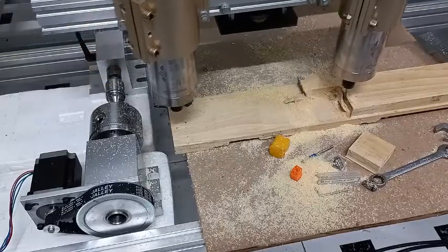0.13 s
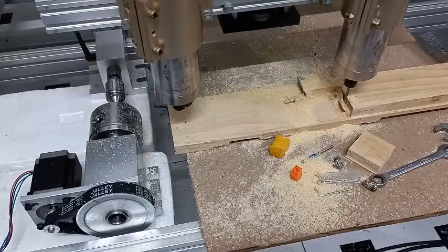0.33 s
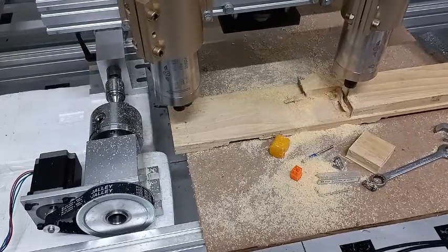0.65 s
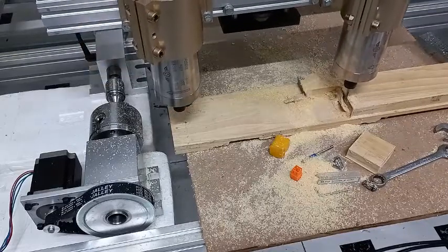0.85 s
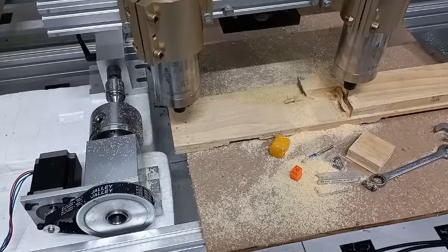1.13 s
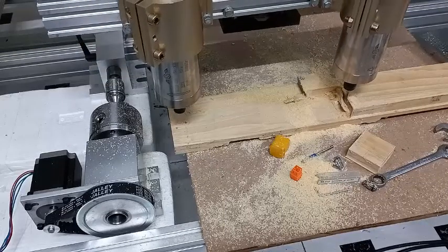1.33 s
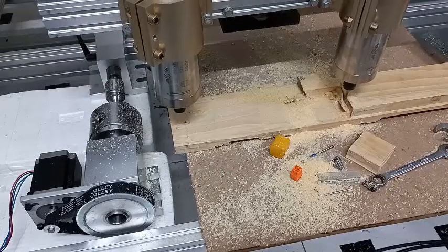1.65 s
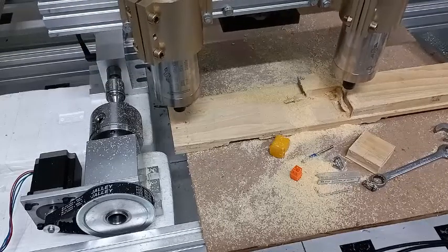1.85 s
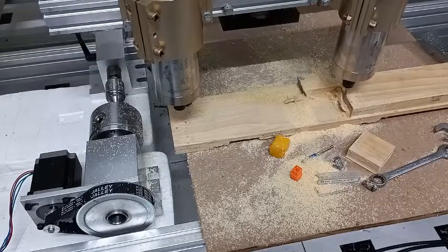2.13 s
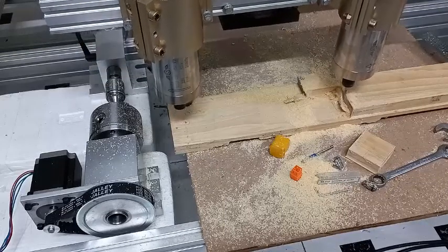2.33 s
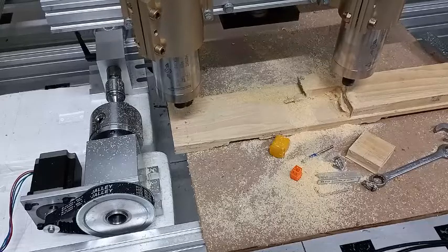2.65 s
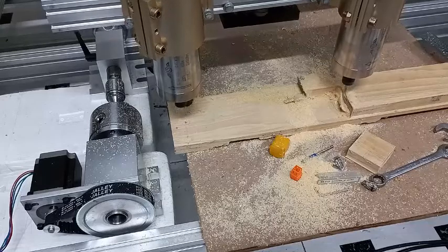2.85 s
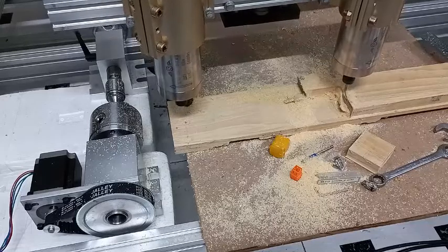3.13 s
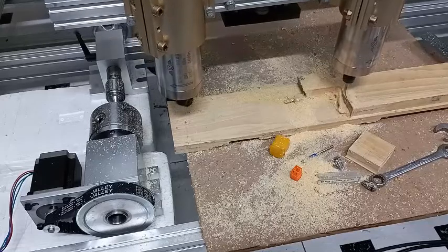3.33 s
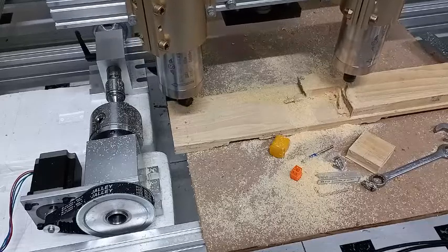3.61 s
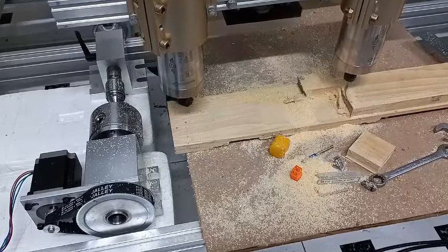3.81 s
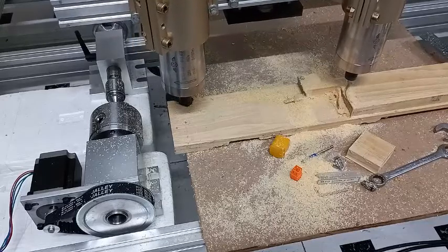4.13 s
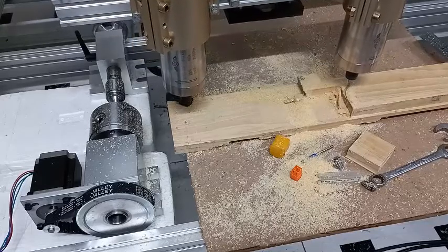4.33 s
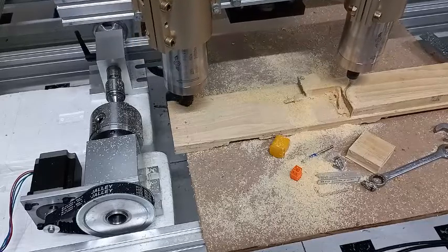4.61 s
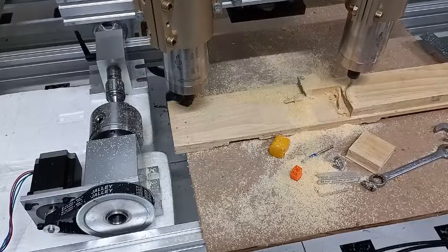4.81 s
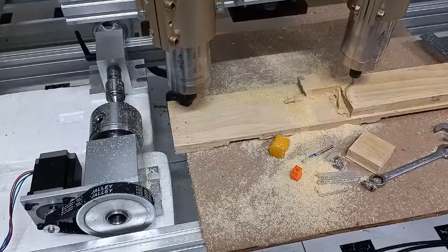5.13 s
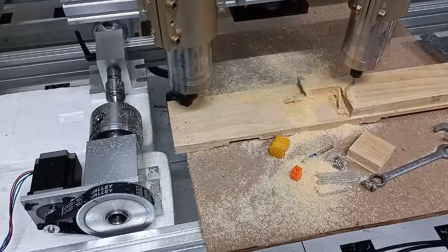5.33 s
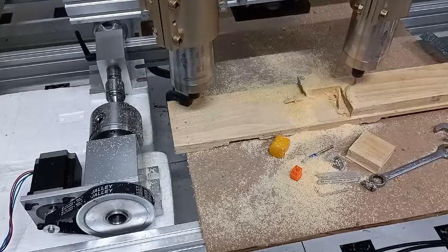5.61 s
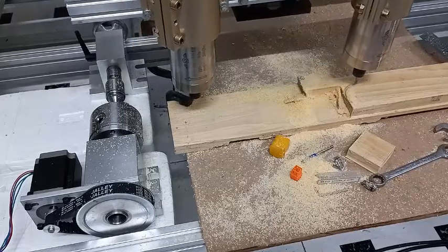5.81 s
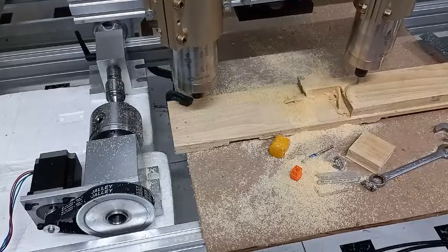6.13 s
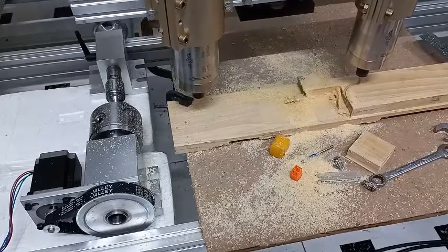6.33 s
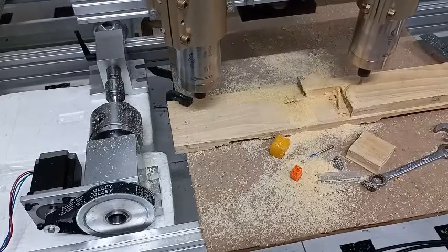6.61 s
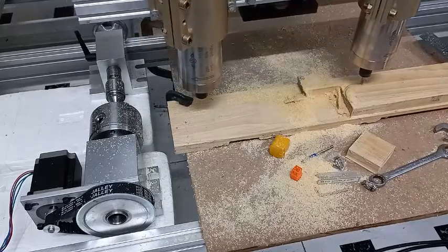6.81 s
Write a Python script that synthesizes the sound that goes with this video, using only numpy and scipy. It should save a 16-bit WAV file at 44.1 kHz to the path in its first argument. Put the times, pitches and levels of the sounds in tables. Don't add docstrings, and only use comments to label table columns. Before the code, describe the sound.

Two router spindles whine steadily; one bites a board with tearing, buzzing noise, squeals briefly, then locks into a shrill continuous scream.

```python
import sys
import numpy as np
from scipy import signal
from scipy.fft import rfft, irfft
from scipy.io import wavfile
from scipy.ndimage import uniform_filter1d, map_coordinates

SR = 44100
rng = np.random.default_rng(int(sys.argv[2]) if len(sys.argv) > 2 else 0)


def gain_from_decibels(decibels):
    exponent = np.asarray(decibels, float) / 20
    return 10 ** exponent


def store_wav(level_fs):
    pcm = np.round(np.clip(np.atleast_2d(level_fs), -1, 1) * 32767)
    wavfile.write(sys.argv[1], SR, pcm.T.astype(np.int16))


N = 306936
TIME = np.arange(N) / SR
TOUCH_S, LOCK_S, SETTLE_S = 1.1, 3.47, 4.55


def unit(x):
    return x / np.sqrt(np.mean(x ** 2) + 1e-20)


def along(points, hz):
    f, v = np.transpose(points)
    return np.interp(np.log(hz + 1), np.log(f + 1), v)


def curves(rows):
    s, *cols = np.transpose(rows)
    return [np.interp(TIME, s, c) for c in cols]


def wobble(rate):
    knots = rng.standard_normal(int(N * rate / SR) + 4)
    return map_coordinates(knots, [TIME * rate], order=1)


def after(s, rise=0.046):
    return np.clip((TIME - s) / rise + .5, 0, 1)


def swells(rows):
    return sum(gain_from_decibels(db) * np.exp(-((TIME - s) / half) ** 2) for s, db, half in rows) + 1e-9


def turns(hz):
    return 2 * np.pi * np.cumsum(hz + 0 * TIME) / SR


def tone(phase, db, pan_db, lead):
    left = gain_from_decibels(db + pan_db / 2) * np.sin(phase + lead / 2)
    right = gain_from_decibels(db - pan_db / 2) * np.sin(phase - lead / 2)
    return np.sqrt(2) * np.array([left, right])


# (frequency [Hz], likeness [0-1])
PORT_LIKENESS = [(40, .4), (90, .5), (160, .95), (300, .92), (600, .7), (950, .4), (1300, .28), (5000, .08)]


def rush(spectrum, patchy_db):
    left_lag_s = .00013
    hz, _, z = signal.stft(rng.standard_normal((2, N)), SR, nperseg=1024)
    field = uniform_filter1d(rng.standard_normal(z.shape[1:]), size=8, axis=0)
    field = uniform_filter1d(field, size=6, axis=1)
    gain = gain_from_decibels(patchy_db * unit(field) + along(spectrum, hz)[:, None])
    turn = np.arccos(np.clip(along(PORT_LIKENESS, hz), -1, 1))[:, None] / 2
    mid, side = z * gain * [np.cos(turn), np.sin(turn)]
    late = np.exp(-2j * np.pi * hz * left_lag_s)[:, None]
    ports = np.array([(mid + side) * late, mid - side])
    return unit(signal.istft(ports, nperseg=1024)[1][:, :N])


# (time [s], level [dB])
CUT_DEPTH = [(1.04, -52), (1.12, -24), (1.5, -14), (1.95, -3.5), (2.3, -5.5), (2.95, -3.5), (3.3, -1.5),
             (3.45, -3.5), (3.58, -7.5), (4.3, -9.5), (6.96, -10.5)]


def effort(idle_db, deep_db, grows, locked_db):
    cut_db = deep_db + grows * curves(CUT_DEPTH)[0] + locked_db * after(LOCK_S, rise=0.16)
    return np.hypot(gain_from_decibels(idle_db), after(TOUCH_S) * gain_from_decibels(cut_db))


def burst(shaft, depth):
    return unit(1 + depth * np.cos(shaft))


# (time [s], lag [half turns])
SLIP = [(0, -1.9), (1.29, .5), (2.17, 1.5), (3.08, 2.5), (3.43, 3.5), (3.97, 4.5), (6.63, 9.5),
        (6.96, 10.1)]


def cutting_shaft(idle):
    return idle - np.pi * curves(SLIP)[0]


def dying(db, hold_s, db_per_s):
    return gain_from_decibels(db - db_per_s * np.maximum(TIME - hold_s, 0))


# (frequency [Hz], density [dB per Hz])
BRAKE_LOW = [(120, -16), (250, -3.5), (400, 3.5), (700, 7), (1000, -5), (1400, -31)]
BRAKE_HIGH = [(700, -31), (1100, 6), (1600, 0.5), (2200, -5.5), (3200, -12), (5000, -21)]


def brake():
    out = dying(-42, hold_s=0.26, db_per_s=62) * rush(BRAKE_LOW, patchy_db=2.5)
    return out + dying(-51.5, hold_s=0.19, db_per_s=120) * rush(BRAKE_HIGH, patchy_db=1.5)


# (start [s], end [s], start pitch [Hz],
# end pitch [Hz], level [dB])
GLIDES = [(0.0, 0.22, 1250, 700, -50), (0.105, 0.195, 880, 710, -43), (0.24, 0.35, 1080, 740, -53),
          (0.0, 0.08, 760, 640, -48), (0.19, 0.25, 690, 590, -46), (1.75, 2.15, 1262, 1256, -54),
          (1.75, 2.15, 1643, 1637, -52), (3.6, 4.9, 300, 140, -68), (4.85, 5.04, 138, 132, -58),
          (4.85, 5.04, 518, 514, -60), (6.66, 6.86, 138, 132, -58), (6.66, 6.86, 518, 514, -58)]


def feed_motors():
    out = 0
    for start, end, from_hz, to_hz, db in GLIDES:
        u = np.clip((TIME - start) / (end - start), 0, 1)
        swell = np.sqrt(np.abs(np.sin(np.pi * u)))
        lead = .2
        if from_hz > 1000:
            lead = 3 if start < 1 else -1.4
        hz = from_hz * (to_hz / from_hz) ** u * (1 + 0.005 * wobble(40))
        out += swell * tone(turns(hz), db + 2.5 * wobble(35), 0, lead)
    return out


# (time [s], level [dB], left-right [dB])
HUM = [(.4, -43.5, 6), (.56, -47.5, 0.5), (1.07, -38, 0), (1.4, -39.5, -1.5), (2.05, -33.5, -1),
       (2.6, -40.5, -6.5), (3.25, -33, 1), (3.43, -34, 2), (3.58, -43.5, -7.5), (4.25, -47.5, -14.5),
       (4.9, -39, -0.5), (5.5, -37, 1), (6.4, -34.5, 3.5), (6.96, -35, 0.5)]


def unbalance_hum(shaft):
    db, pan_db = curves(HUM)
    lead = np.interp(TIME, (4.2, 4.8), (-.55, .05))
    return tone(shaft, db + 1.38 * wobble(25), pan_db, lead)


def second_order(shaft, idle):
    free_db = -49 - 3 * after(2.1, rise=0.25) + wobble(25)
    strain = gain_from_decibels(-41.5 + 0.5 * curves(CUT_DEPTH)[0]) + swells([(1.92, -39.5, 0.15), (2.48, -46, 0.15)])
    cut_db = 20 * np.log10(strain) + 1.5 * wobble(25)
    free = tone(2 * idle, free_db, -1.6, -0.3)
    return free + after(TOUCH_S) * tone(2 * shaft, cut_db, 0.64, -0.27)


# (frequency [Hz], level [dB])
INVERTER = [(4243, -69), (4300, -74.5), (4360, -75), (5092, -68.5), (5855, -73), (6236, -66.5), (6618, -63),
            (6999, -69.5), (7381, -61.5), (7764, -109), (8146, -67), (8527, -86.5), (8964, -121),
            (9346, -83), (9788, -83), (10111, -93)]
MOTOR_LINES = [(200, -72), (266, -68.5), (577, -64), (1049, -67), (1144.5, -73)]


def drive_whine():
    out = 0
    for hz, db in INVERTER + MOTOR_LINES:
        high = hz > 2000
        phase = turns(hz + 1.61 * wobble(8))
        out += tone(phase, db + 0.5 + 3.7 * wobble(7), 3 * wobble(0.94) * high, 5.2 * wobble(0.31) * high)
    return out


def fans():
    fan_hz = 5328
    beat_hz = np.interp(TIME, (.25, .55), (16, 7)) + (1.5 + 7 * after(TOUCH_S)) * wobble(6)
    db = np.interp(TIME, (0, 2.0, 2.6), (-61, -59.5, -67)) + 3 * after(TOUCH_S) * wobble(18)
    return tone(turns(fan_hz), db, 5, .6) + tone(turns(fan_hz + beat_hz), db - 2.5, 5, .6)


# (frequency [Hz], density [dB per Hz])
RUMBLE = [(15, -21), (28, 10), (60, -16.5), (100, 8.5), (160, -13.5)]
JOLT = [(15, -35), (30, -2), (60, 1), (95, -20), (140, -35.5)]


def floor():
    unsteady = 4.5 * np.array([wobble(4.8), wobble(6.6)])
    db = -60.15 + 2 * after(LOCK_S) + unsteady - 9 * swells([(3.6, 0, 0.18)])
    jolt = after(LOCK_S, rise=0.079) * gain_from_decibels(-65 - 5.5 * (TIME - LOCK_S))
    return gain_from_decibels(db) * rush(RUMBLE, patchy_db=2.0) + jolt * rush(JOLT, patchy_db=-5.5)


# (frequency [Hz], density [dB per Hz])
BOARD = [(59, -73), (100, -39), (316, -11), (379, -6), (652, -14), (762, -8.5), (901, -12.5), (1120, -9.5),
         (1230, -11.5), (2200, -29.5), (2860, -24), (4840, -120)]


def board(shaft):
    gain = effort(-60.5, -40.5, grows=1, locked_db=0.9) + dying(-48.5, hold_s=0, db_per_s=60)
    return gain * burst(shaft, depth=0.053) * rush(BOARD, patchy_db=2.0)


# (frequency [Hz], density [dB per Hz])
CHIPS = [(940, -13), (1600, 4.5), (1950, 0.5), (2330, -2.5), (2440, 0), (2650, -1.5), (3850, -2.5),
         (3980, -7), (4430, -9), (6000, -14.5), (7800, -28), (13200, -120)]


def chips(shaft):
    gain = effort(-68.5, -37, grows=1.22, locked_db=4)
    return gain * burst(shaft, depth=0.72) * rush(CHIPS, patchy_db=1.5)


# (frequency [Hz], density [dB per Hz])
HISS = [(2940, -35), (4500, -6), (5100, -11.5), (5500, -5), (6340, -17), (6970, -6), (9410, -10.5),
        (10000, -21), (12000, -120)]
SHEEN = [(9200, -33), (10000, -0.5), (10400, 3.5), (11000, -6), (14300, -120)]


def air_hiss(shaft):
    gain = effort(-59.5, -46.5, grows=.5, locked_db=6) * gain_from_decibels(-5 * after(SETTLE_S, rise=0.83))
    out = gain * burst(shaft, depth=1.0) * rush(HISS, patchy_db=2.0)
    sheen = effort(-68, -53, grows=.7, locked_db=-14)
    return out + sheen * burst(shaft, depth=0.87) * rush(SHEEN, patchy_db=4)


# (order [per turn], left lead [rad], left-right [dB])
FLUTE_PORTS = [(3, -2, 2.5), (4, -1.4, 0), (5, -1.4, 9), (6, 1.6, -5.5)]
# (time [s], level [dB], half length [s])
GRAIN = [
    [(1.17, -46.5, 0.23), (2.3, -42.5, 0.46), (2.93, -38.5, 0.11), (3.4, -40.5, 0.29)],
    [(1.25, -70.5, 0.052), (1.9, -37, 0.23), (2.72, -45, 0.18), (3.38, -41, 0.14)],
    [(1.78, -50, 0.21), (2.6, -57.5, 0.095), (3.2, -63, 0.32), (6.6, -63, 0.16)],
    [(1.22, -61, 0.056), (2.05, -55, 0.041), (2.5, -53.5, 0.12), (3.38, -51.5, 0.14)],
]


def flutes(shaft):
    steady_dbs, fades_db_per_s = (-67.5, -59.5, -67.5, -59.5), (-4.5, -1, 0.2, 0.4)
    out = 0
    for rows, steady_db, fade, (order, lead, pan_db) in zip(GRAIN, steady_dbs, fades_db_per_s, FLUTE_PORTS):
        db = 20 * np.log10(swells(rows) + gain_from_decibels(steady_db - fade * (TIME - LOCK_S)))
        phase = order * shaft + rng.uniform(0, 2 * np.pi) + 0.22 * wobble(40)
        pan_db, lead = pan_db + 1.5 * wobble(2.97), lead + .3 * wobble(2.55)
        out += after(TOUCH_S) * tone(phase, db + 4 + 1.8 * wobble(30), pan_db, lead)
    return out


# (frequency [Hz], level [dB])
BITE = [(2600, 0), (3100, -1), (3800, -8), (4550, 0), (4950, -4), (5300, -4), (5900, -3), (6500, 0),
        (7200, 1), (7900, -6), (9000, -9), (10300, -8), (12000, -14)]
# (time [s], shaft speed [Hz])
SAG = [(1.5, 380.85), (1.9, 380.6), (2.3, 379.8), (2.9, 378.9), (3.42, 379.6), (3.55, 380.4), (4.2, 380.6),
       (6.96, 380.7)]


def bite():
    shaft_hz = 380.8
    db = -54 + 0.43 * curves(CUT_DEPTH)[0] - 7 * after(LOCK_S, rise=0.27)
    shaft = turns(curves(SAG)[0] + 0.37 * wobble(30.03))
    out = 0
    for k in range(7, 31):
        phase = k * shaft + rng.uniform(0, 2 * np.pi) + 0.35 * wobble(150)
        settled_db = -3 * after(SETTLE_S, rise=1.0) * (10 < k < 14)
        order_db = db + along(BITE, k * shaft_hz) + settled_db + 4 * wobble(15)
        out += tone(phase, order_db, 5 * wobble(2.7), 2.3 * wobble(8.9))
    return after(TOUCH_S) * out


# (time [s], level [dB], half length [s])
TRIES = [
    (2.0, -58, 0.58),
    (2.45, -49.5, 0.28),
    (2.83, -38.5, 0.14),
    (3.08, -48.5, 0.22),
]


def tries():
    return swells(TRIES)


# (frequency [Hz], density [dB per Hz])
TOOL = [(5600, -43), (6100, -46.5), (6600, 8.5), (7100, 8), (7600, -5.5), (8000, -2.5), (8600, -20)]


def tool_ring(shaft):
    gain = effort(-100, -51, grows=0.07, locked_db=8)
    gain = gain + gain_from_decibels(-7.5) * uniform_filter1d(tries(), size=SR // 4)
    return gain * gain_from_decibels(0.8 * wobble(40)) * burst(shaft, depth=0.61) * rush(TOOL, patchy_db=3.5)


# (time [s], level [dB])
CHATTER = [(3.4, -65), (3.48, -28.5), (3.55, -30), (3.82, -31.5), (3.95, -29.5), (4.12, -28.5),
           (4.37, -32.5), (4.65, -28), (4.9, -29), (5.3, -28), (5.7, -27), (6.05, -28.5), (6.15, -35.5),
           (6.55, -34.5), (6.96, -31.5)]
# (time [s], frequency [Hz])
TOOL_HZ = [(2.5, 6727), (2.6, 6597), (3.42, 6622), (3.48, 6690), (3.75, 6688), (4.3, 6666), (4.9, 6658),
           (6.05, 6652), (6.13, 6639)]
# (time [s], loss [dB], half length [s])
STUMBLES = [
    (5.886, 8, 0.039),
    (6.085, 6, .025),
    (6.631, 2.5, 0.054),
]
# (time [s], left-right [dB], left lead [rad])
STANCE = [(2.4, 0, -.5), (2.75, 3, -4.2), (3.0, -8, -4.4), (3.42, 2, -6.4), (3.53, -10, -8.8),
          (3.68, -14, -8.8), (3.82, -15, -8), (4.05, -5, -7.8), (4.25, 2, -7.7), (4.35, 6, -10.8),
          (4.6, 1, -10.7), (5.6, -6, -10.6), (6.05, -6, -10.9), (6.2, -6, -11.8), (6.96, -4, -11.3)]
# (time [s], level re tone [dB], left-right [dB], left lead [rad])
UPPER = [(3.4, -14, -3, 2.2), (3.53, -1, -2, 2.2), (3.67, -1, -6, 1.4), (3.81, -3, 3, .9),
         (4.23, -2, 4, .5), (4.34, -7, 3, -.2), (4.5, -10.5, 6, -.2), (4.65, -16.5, 3, -2),
         (4.95, -14, -8, -4.2), (5.1, -18, -11, -4), (5.25, -17, -13, -7), (5.5, -15, -3, -8),
         (5.75, -14, 8, -8.2), (6.04, -9, 8, -9.5), (6.2, -5, 9, -10.8), (6.5, -4.5, 8, -11.3),
         (6.75, -1.5, 3, -10.3)]
SECOND = [(3.4, -14, 5, -1.7), (3.53, -2.5, 5, -1.7), (3.8, -5.5, 12, -1.5), (3.95, -10.5, 13, -1.5),
          (4.37, -6, 6, -2.2), (4.8, -14, 4, -2.3), (5.35, -17, -3, -2.3), (6.04, -16, -4, -3.5),
          (6.2, -11, -9, -5), (6.55, -8.5, -5, -5.3), (6.8, -15, -11, -6.2)]
# (offset [turns], level [dB])
FAR_BANDS = [(-6, -33), (-5, -30), (-4, -17), (-3, -12), (-2, -12), (5, -24), (6, -15)]
OVERTONE = [(-2, -27), (-1, -23), (0, -22), (1, -16), (2, -19)]


def chatter(shaft):
    locked_db, = curves(CHATTER)
    pan_db, lead = curves(STANCE)
    upper_db, *upper_ports = curves(UPPER)
    second_db, *second_ports = curves(SECOND)
    loss_db = sum(db * np.exp(-((TIME - s) / half) ** 2) for s, db, half in STUMBLES)
    locked = gain_from_decibels(locked_db - loss_db) * (TIME > CHATTER[0][0])
    db = 20 * np.log10(tries() + locked) - .7 + wobble(30) + 1.3 * wobble(14)
    upper_db = np.minimum(upper_db + loss_db, -1)
    lower_db = -9.5 + 0.5 * upper_db
    since = np.maximum(TIME - LOCK_S, 0)
    third_db = -39.5 - 5.8 * since
    fourth_db = 20 * np.log10(gain_from_decibels(-46 - 22 * since) + gain_from_decibels(-58) * after(4.35, rise=.2))

    loose = np.clip((-34 - db) / 8, .15, 2)
    mode_hz = curves(TOOL_HZ)[0] - 3.5 * loss_db + 5 * wobble(4)
    mode = turns(mode_hz) + loose * wobble(60) + .15 * wobble(260)

    out = tone(mode, db, pan_db, lead)
    out += tone(mode + shaft, db + upper_db + 1.5 * wobble(16), *upper_ports)
    lower_pan_db = 5 - 5 * after(5.4, rise=.3) + 2 * wobble(2.5)
    out += tone(mode - shaft, db + lower_db, lower_pan_db, 1.8 + wobble(1.2))
    out += tone(mode + 2 * shaft, db + second_db + loss_db / 2 + 2 * wobble(16), *second_ports)
    third_db = np.minimum(db - 8, third_db) + 2 * wobble(16)
    out += tone(mode + 3 * shaft, third_db, 2 * wobble(2.5), .4 * wobble(1.2))
    fourth_db = np.minimum(db - 15, fourth_db) + 2 * wobble(16)
    out += tone(mode + 4 * shaft, fourth_db, 0, .5 + .6 * wobble(1.5))
    for k, band_db in FAR_BANDS:
        far_db = db + lower_db + band_db + 3 * wobble(16)
        out += tone(mode + k * shaft, far_db, 3 * wobble(1.5), 2.5 * wobble(.8))
    for k, band_db in OVERTONE:
        double_db = db + band_db + 2.5 * wobble(9)
        out += tone(2 * mode + k * shaft, double_db, 4 * wobble(1.5), 2.5 * wobble(.8))
    return out


def rippled(x, depth_db):
    z = signal.stft(x, nperseg=1024)[2]
    field = uniform_filter1d(rng.standard_normal(z.shape[1:]), size=3, axis=0)
    field = uniform_filter1d(field, size=18, axis=1)
    field *= (np.arange(len(z[0])) > 28)[:, None]
    gain = gain_from_decibels(depth_db * unit(field) - depth_db ** 2 / 9)
    return signal.istft(z * gain, nperseg=1024)[1][:, :N]


def scene():
    idle = turns(381.74 + 0.2645 * wobble(6))
    shaft = cutting_shaft(idle)
    tones = feed_motors() + unbalance_hum(shaft) + second_order(shaft, idle) + drive_whine() + fans()
    noises = floor() + board(shaft) + chips(shaft) + air_hiss(shaft) + tool_ring(shaft)
    return brake() + tones + rippled(noises, depth_db=2.6) + flutes(shaft) + bite() + chatter(shaft)


def skipped(dry):
    chip_hz, drop_hz, slip_hz, slip_s, top_hz = 48000, 3890.64, 9.36, 0.0455, 10760
    fast = signal.resample_poly(dry, chip_hz // 300, SR // 300, axis=1)
    kept = np.arange(N) + np.floor(drop_hz * TIME) + np.floor(slip_hz * (TIME - slip_s) + 1)
    x = fast[:, np.minimum(kept.astype(int), fast.shape[1] - 1)]
    return irfft(rfft(x) * (np.fft.rfftfreq(N, 1 / SR) < top_hz), N)


# (time [s], share removed [0-1])
BAND_DIP = [(3.6, 0), (4.3, .3), (4.7, .05), (5.6, 0), (6.1, .2), (6.4, .75), (6.75, .75), (6.96, .3)]


def band_dipped(x):
    centre_hz, width_hz = 4520, 560
    hz = np.fft.rfftfreq(N, 1 / SR)
    band = irfft(rfft(x) * np.exp(-((hz - centre_hz) / width_hz) ** 4), N)
    share = np.clip(curves(BAND_DIP)[0] + 0.2 * wobble(14) * after(4.3), -.5, 1)
    return x - share * band


def masked(x, under_db, near_db, quiet_db):
    def swap(pair):
        return np.array([pair[0] + pair[1], pair[0] - pair[1]]) / np.sqrt(2)

    z = signal.stft(swap(x), nperseg=2048, noverlap=1536)[2]
    power = np.abs(uniform_filter1d(np.abs(z) ** 2, size=4, axis=2))
    band = np.repeat(uniform_filter1d(power, size=5, axis=1)[:, 2::5], repeats=5, axis=1)
    treble = power.mean(axis=0) * (np.arange(power.shape[1]) > 60)[:, None]
    typical = np.exp(uniform_filter1d(np.log(power + 1e-16), size=60, axis=1))
    hidden = uniform_filter1d(treble, size=320, axis=0) * gain_from_decibels(under_db) ** 2
    hidden = hidden + typical * gain_from_decibels(near_db) ** 2 + gain_from_decibels(quiet_db) ** 2
    hidden[:, :36] *= .1
    hidden[:, :66] *= .5
    return swap(signal.istft(z * (band > hidden), nperseg=2048, noverlap=1536)[1][:, :N])


def packed(x, bits, under_db, round_up):
    n, k = np.arange(2048), np.arange(505)
    window = signal.windows.kaiser_bessel_derived(2048, 4 * np.pi)[:, None]
    basis = window * np.cos(np.pi / 1024 * (n[:, None] + 512.5) * (k + .5))
    at = np.arange(N // 1024 + 3)[:, None] * 1024 + n
    wide = np.pad(np.array([x[0] + x[1], x[0] - x[1]]) / 2, ((0, 0), (1260, 4096)))
    c = wide[:, at] @ basis

    step = np.abs(c).mean(axis=(0, 2)) + 1e-9
    for _ in range(8):
        spent = np.log2(1 + np.abs(c) / step[:, None]).mean(axis=(0, 2))
        step = step * 2 ** (1.5 * (spent - bits))
    loudest = (c ** 2).max(axis=0)
    near = np.sqrt(np.abs(uniform_filter1d(loudest, size=150, axis=1, origin=45))) * (k > 230)
    near = np.repeat(near[:, 16::32], repeats=32, axis=1)[:, :len(k)]
    step = np.maximum(step[:, None] * np.where(k < 14, .4, 1), gain_from_decibels(under_db) * near)
    c = np.sign(c) * np.floor((np.abs(c) / step) ** .75 + round_up) ** (4 / 3) * step

    mid, side = [np.bincount(at.ravel(), (v @ basis.T).ravel())[1260:][:N] / 512 for v in c]
    return np.array([mid + side, mid - side])


def low_pass(x):
    return signal.sosfilt(signal.butter(12, 11130, fs=SR, output="sos"), x)


def record(dry):
    x = band_dipped(skipped(dry))
    x = masked(x, under_db=-18, near_db=-1, quiet_db=-106)
    mix = packed(x, bits=1.03, under_db=-23, round_up=.36)
    return low_pass(mix)


dry = scene()
out = record(dry)
store_wav(out)
```